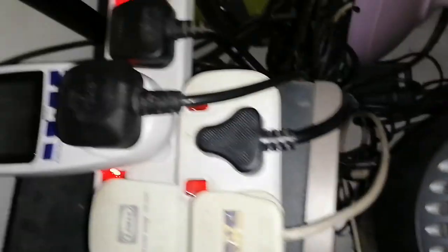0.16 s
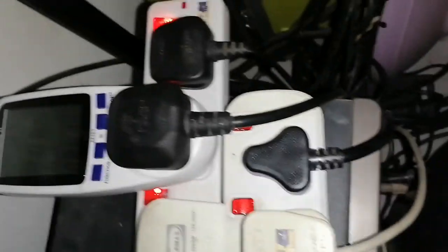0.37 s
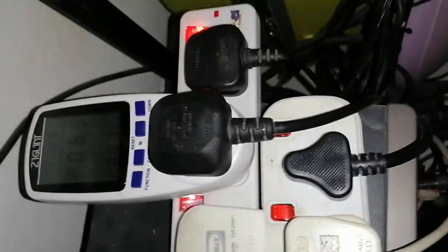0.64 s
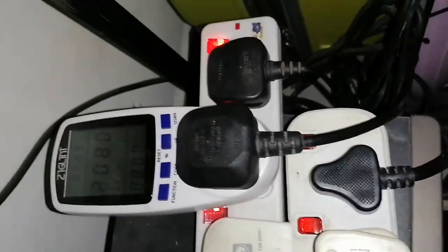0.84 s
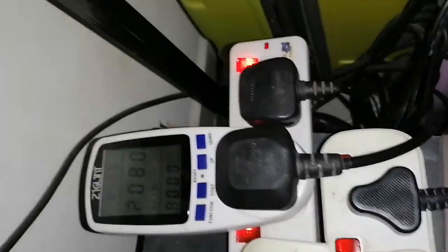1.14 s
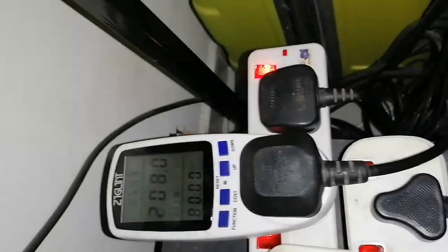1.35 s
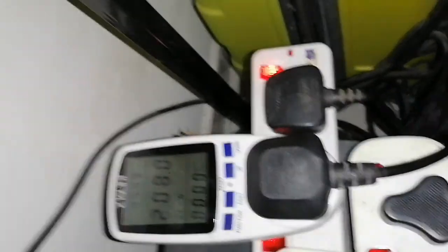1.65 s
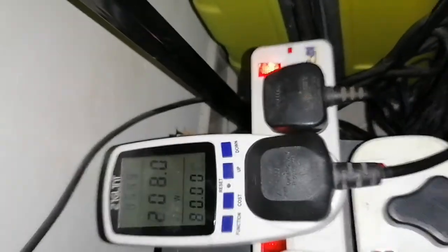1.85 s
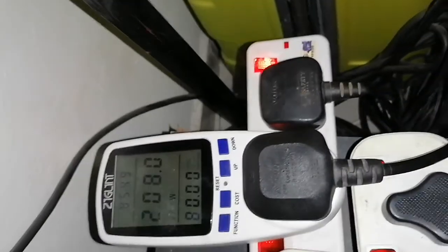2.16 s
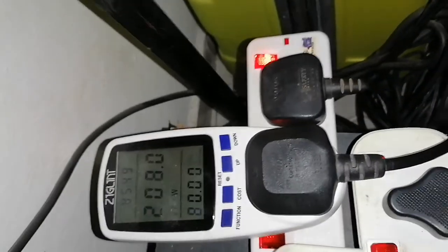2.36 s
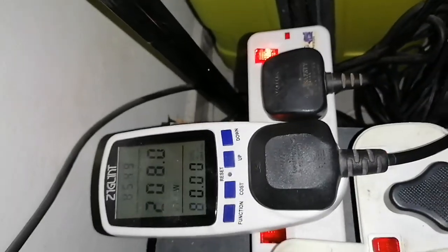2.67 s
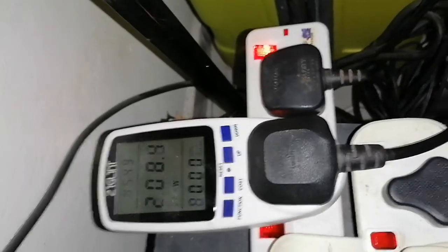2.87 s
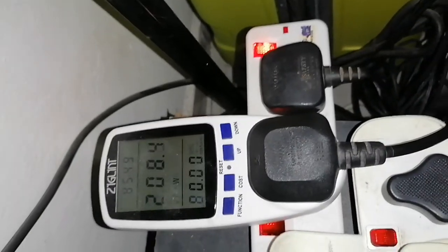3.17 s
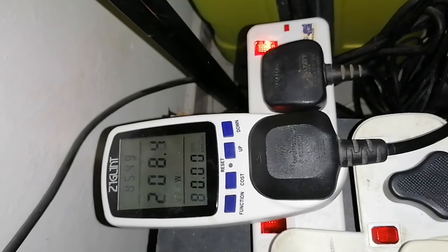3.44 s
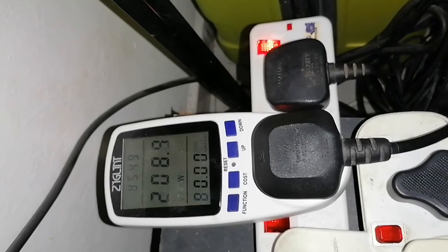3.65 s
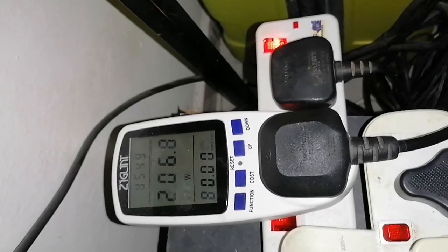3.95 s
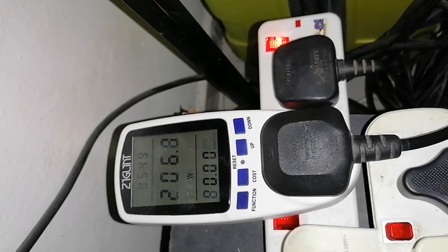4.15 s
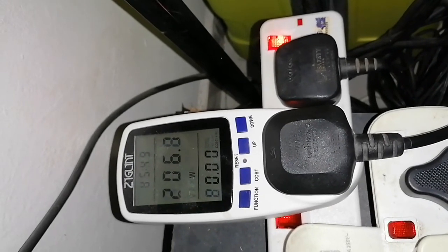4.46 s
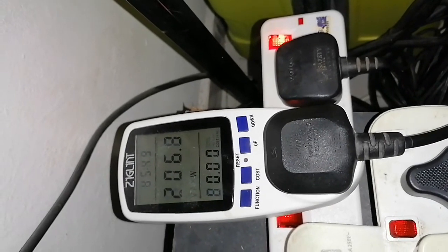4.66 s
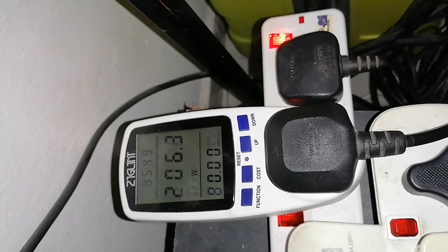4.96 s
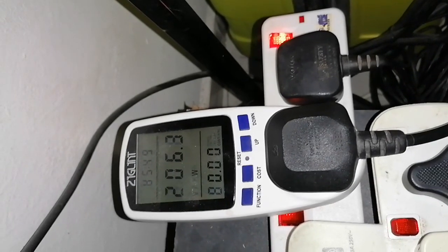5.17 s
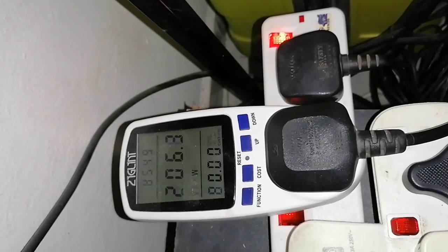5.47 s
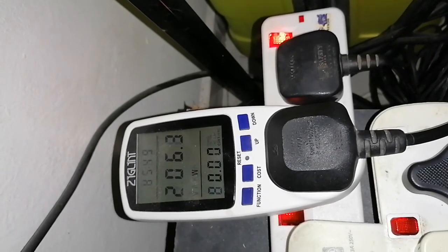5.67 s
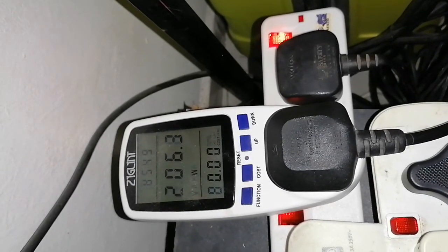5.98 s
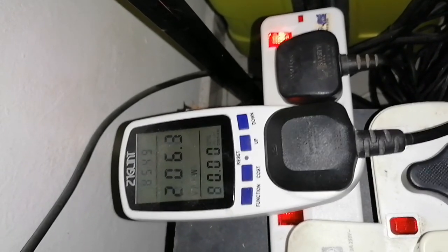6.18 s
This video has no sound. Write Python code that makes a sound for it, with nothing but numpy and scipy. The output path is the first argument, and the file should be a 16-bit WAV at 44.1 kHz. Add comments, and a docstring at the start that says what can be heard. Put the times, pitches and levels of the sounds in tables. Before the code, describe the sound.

Close to running computers in a cramped corner, cooling fans give a continuous airy rush over a low hum and faint whine. A soft rustle opens it. From about one and a half seconds a finger knocks the handheld microphone, brushes twice, taps and slides, mostly on the left. Rubbing fades by three seconds, leaving only steady fans.

```python
"""Rushing, humming computer fans, with mains buzz and faint coil whine; a soft rustle at the very start.
Fans are coloured noise, tones are wandering sines; standing waves fade as the handset moves in.
At the left port a finger knocks, brushes twice, taps and slides to rest: filtered impulses for the
knocks and taps, shaped noise for the rubbing. Gain control and a treble cut follow."""
import sys
import numpy as np
from scipy import signal
from scipy.fft import rfft, irfft
from scipy.io import wavfile

SR = 44100
rng = np.random.default_rng(int(sys.argv[2]) if len(sys.argv) > 2 else 0)


def generate_wav(signal):
    """Clip the signal to [-1, 1] and save it as 16-bit WAV at the path in sys.argv[1]."""
    frames = np.transpose(np.atleast_2d(signal))
    scaled = np.clip(frames, -1, 1) * 32767
    pcm = np.round(scaled).astype(np.int16)
    wavfile.write(sys.argv[1], SR, pcm)


N = 278491
TIME_S = np.arange(N) / SR
FREQS_HZ = np.maximum(np.fft.rfftfreq(N, 1 / SR), 1)

# Levels below are before the trims and the gain control.
# fan rush at each microphone: freq_hz, left_db_per_hz, right_db_per_hz
FAN_SPECTRUM = [(15.0, -81.7, -73.0), (45.0, -74.4, -69.0), (130.0, -78.8, -73.6), (260.0, -80.1, -78.2),
                (600.0, -86.8, -84.0), (900.0, -78.8, -95.0), (1200.0, -90.4, -86.3),
                (1500.0, -98.9, -88.1), (3000.0, -100.4, -91.9), (3900.0, -108.2, -101.4),
                (5200.0, -102.4, -97.1), (8800.0, -111.2, -102.3), (11500.0, -111.5, -107.1),
                (15600.0, -116.0, -110.9)]
# case, corner and port resonances: freq_hz, width_hz, left_db, right_db
RESONANCES = [(71, 12, 4.5, 2), (160.4, 10, 5.5, 4), (197.4, 39, 6.5, 5), (290, 35, 0, 3.5),
              (347, 36, 1.5, 0.5), (451, 73.3, -0.5, 11.5), (517, 52, 4.5, 10), (570, 50, 1.5, -1),
              (706, 216, -2, 12), (862, 103, -7, -1), (969, 173, -2.5, 9.5), (1940, 52, -12, 2.5),
              (2110, 430, 4, 3.5), (2720, 480, 4.5, 0.4), (3300, 410, 6, 1.2), (6410, 910, 4, 5),
              (7248, 570, 14.5, 12.5), (7220, 150, 1.5, 2), (10350, 2100, -1.5, -2), (14600, 500, 6.2, 6.5)]
# likeness of the air noise at both microphones: freq_hz, likeness_0_to_1, left_lead_rad
LIKENESS = [(40.6, 0.87, 0), (130, 0.91, 0.2), (313, 0.92, -1), (363, 0.03, 1), (435, 0.8, -3.5),
            (470, 1, -1), (596, 0.62, -1.5), (745, 1, 1.74), (903, 0.3, -3), (1210, 0.53, -3.0),
            (1450, 0.05, 2.5), (12000, 0.02, -8)]
# rotor and blade tones, mains hum, coil whine: freq_hz, left_rms_db, right_rms_db
TONES = [(41.0, -58.2, -53.8), (48.0, -54.7, -49.1), (82.0, -58.6, -54.2), (100.0, -70.8, -65.8),
         (120.0, -64.0, -48.7), (123.0, -65.0, -62.0), (150.0, -67.0, -63.5), (164.3, -58.4, -52.7),
         (186.5, -63.4, -58.8), (194.5, -61.6, -57.1), (205.5, -63.8, -59.5), (219.0, -69.3, -66.1),
         (252.5, -72.3, -66.9), (291.5, -71.6, -69.7), (327.5, -72.5, -71.0), (360.0, -66.0, -66.5),
         (514.0, -73.0, -60.5), (600.0, -80.0, -71.0), (2288.0, -93.3, -78.5), (6850.5, -88.5, -84.9),
         (7001.0, -82.0, -82.0), (7051.0, -85.5, -73.8), (12053.5, -105.8, -89.0)]
# corner colour away from the resting place: freq_hz, width_hz, left_db, right_db
STANDING_WAVES = [(124, 22, 8, -2.5), (286, 22, 4.5, 0), (410, 59, -4, 6), (482, 37, 11, 0),
                  (660, 82, 6.5, -4), (900, 110, 0, 2.5), (1250, 110, 1, 2), (1690, 230, 2, 3),
                  (8000, 8900, 1.6, 0.5)]
# handset distance from its resting place: time_s, offset_0_to_1
HANDSET_OFFSET = [(0, 1), (1.1, 0.76), (1.7, 0.3), (2.6, 0.04), (6.3, 0)]
# knocks on the casing: start_s, thud_db, thud_low_hz, thud_high_hz, ring_db, tick_db, tick_hz, sway_db
KNOCKS = [(1.5403, 17.6, 125, 1140, 0.7, -14, 6300, 8), (1.5433, 7, 170, 270, -20, -26, 10000, -20),
          (1.8425, -4, 250, 650, -40, -40, 6500, -15), (1.9573, 12.5, 430, 920, -33, -21, 6500, -10),
          (1.9632, 2, 80, 850, -35, -35, 6500, -10), (2.0101, 7.3, 140, 900, -25, -26, 6500, -10),
          (2.055, 10, 140, 360, -40, -34, 6500, -10), (2.9115, -20, 200, 900, -32, -21, 6500, -18)]
# casing ring: freq_hz, width_hz, level_db (relative)
CASING_MODES = [(1700, 480, 2.5), (3250, 1500, -2.5), (5100, 1150, 1)]
# finger brushing the port: start_s, length_s, final_level_db, swell_db, catch_db (as the skin lets go)
BRUSHES = [(1.622, .055, -39, -0.5, -50), (1.733, .054, -34, 12, -30)]
# finger pushes along the casing: start_s, length_s, level_db
SLIDES = [(1.988, .029, -48), (2.045, .018, -58), (2.072, .1, -52.5), (2.174, .016, -44),
          (2.195, .027, -48.5), (2.23, .08, -56), (2.305, .075, -49), (2.38, .14, -54),
          (2.395, .044, -49.5), (2.478, .02, -54), (2.568, .016, -49.5), (2.654, .06, -54),
          (2.695, .012, -49), (2.805, .025, -60), (2.98, .035, -55.5)]
# low rumble of hard presses: start_s, length_s, final_level_db, swell_db
PRESSES = [(1.982, .038, -41.5, 4), (2.066, .044, -37.5, 3), (2.115, .02, -43, 0), (2.158, .022, -45.5, 0)]
# rustle as the handset swings in: start_s, length_s, final_level_db, swell_db
RUSTLE = (-0.1, 0.28, -63.5, -1)
# brushing spectrum: freq_hz, relative_db
BRUSH_COLOUR = [(100, -8), (700, -12), (950, 4), (1350, -7.5), (1700, -4.5), (2300, -7), (2900, -6),
                (3900, -18.5), (5400, -13), (7000, -8.5), (8200, -21), (11000, -31), (15000, -42)]
# sliding spectrum: freq_hz, relative_db
SLIDE_COLOUR = [(200, 5), (1000, 5.5), (1400, -8), (1900, 1.5), (2400, -4), (2800, 4), (3700, -6.5),
                (5500, 2.5), (6900, 2.5), (8200, -9), (11000, -21), (15000, -25)]
# pressing spectrum: freq_hz, relative_db
PRESS_COLOUR = [(40, -22), (140, 3), (240, 11), (520, -6), (780, -3), (1100, -5), (1400, -18), (2600, -15),
                (4000, -40)]
# rustle spectrum: freq_hz, relative_db
RUSTLE_COLOUR = [(1000, -4), (2000, -3), (3900, -6), (5200, -2), (6600, 3), (8500, -4.5), (11000, -11),
                 (15000, -13)]

FAN_TRIM_DB, TONE_TRIM_DB = -0.09, 0.1
CONTACT_DELAY_S = 0.0006  # the fingertip flattens before the casing rings
BRUSH_ATTACK_S, BRUSH_RELEASE_S = 0.016, 0.0053
CATCH_S, CATCH_LOW_EDGE_HZ = 0.0035, 4460
SLIDE_ATTACK_S, SLIDE_RELEASE_S = 0.011, 0.008
PRESS_ATTACK_S, PRESS_RELEASE_S = 0.0087, 0.0079
CREEP_START_S, CREEP_LENGTH_S = 2.07, 1.5
CREEP_FINAL_DB, CREEP_FADE_DB = -77, 21
SNAG_DB, SNAG_HZ = 0.55, 110  # slower unevenness of the grip
RUSTLE_RELEASE_S = 0.046
TREBLE_CUTOFF_HZ = 15600


def from_db(db):
    """Decibels to gain."""
    return 10 ** (np.asarray(db) / 20)


def rms_one(x):
    """Scale to unit power."""
    return x / np.sqrt(np.mean(x ** 2) + 1e-20)


def in_time(rows):
    """Interpolate a curve at every sample."""
    return np.interp(TIME_S, *np.transpose(rows))


def in_frequency(rows):
    """Interpolate each column at every frequency on a log axis."""
    hz, *columns = np.transpose(rows)
    return np.array([np.interp(np.log(FREQS_HZ), np.log(hz), column) for column in columns])


def bell(hz, width_hz):
    """Bell over frequency with unit peak; the width is two standard deviations."""
    return np.exp(-2 * ((FREQS_HZ - hz) / width_hz) ** 2)


def bumps(rows):
    """Left and right gain in dB of bell-shaped peaks and dips."""
    return sum(np.outer([left_db, right_db], bell(hz, width_hz))
               for hz, width_hz, left_db, right_db in rows)


def butter(x, hz, kind, order=2):
    """Causal low-, high- or band-pass."""
    sos = signal.butter(order, hz, kind, fs=SR, output="sos")
    return signal.sosfilt(sos, x + 1e-18)


def white():
    """Spectrum of fresh unit-power white noise."""
    return rfft(rng.standard_normal(N))


def drift(rate_hz):
    """Smooth random drift of unit rms."""
    return rms_one(irfft(white() / (1 + (FREQS_HZ / rate_hz) ** 2) ** 2, N))


def reflections(spread_db, decay_s):
    """Echoes off near walls comb the middle range with fine peaks and dips, in dB."""
    echoes = rng.standard_normal(N) * np.exp(-TIME_S / decay_s) * (TIME_S > decay_s / 2)
    comb = rms_one(rfft(echoes).real)
    middle = FREQS_HZ / (FREQS_HZ + 300) / (1 + (FREQS_HZ / 6500) ** 3)
    return spread_db * comb * middle


def fan_rush(flutter_db):
    """Blade turbulence: resonance-coloured noise, partly alike at both microphones, slightly fluttering."""
    combs_db = [reflections(spread_db=1.2, decay_s=0.012) for side in range(2)]
    level_db = in_frequency(FAN_SPECTRUM) + combs_db + bumps(RESONANCES)
    alike, lead_rad = in_frequency(LIKENESS)
    right = white()
    left = alike * np.exp(1j * lead_rad) * right + np.sqrt(1 - alike ** 2) * white()
    # sqrt(SR / 2) turns level per Hz into sample amplitude
    rush = irfft(np.array([left, right]) * from_db(level_db), N) * np.sqrt(SR / 2)
    return rush * from_db(flutter_db * drift(29))


def hum(wander, waver_db):
    """Rotor, mains and coil tones: sines that wander slightly in pitch and strength."""
    out = np.zeros((2, N))
    speeds = [drift(2.4) for k in range(4)]
    swells = [drift(5.7) for k in range(5)]
    for k, (hz, left_db, right_db) in enumerate(TONES):
        speed = 1 + wander * speeds[k % len(speeds)]
        turns = hz * np.cumsum(speed) / SR + rng.random()
        sine = np.sqrt(2) * np.sin(2 * np.pi * turns)
        tone = sine * from_db(waver_db * swells[k % len(swells)])
        out += np.outer(from_db([left_db, right_db]), tone)
    return out


def moving(fans):
    """Standing waves in the corner colour the fans until the handset has moved in."""
    away = irfft(rfft(fans) * from_db(bumps(STANDING_WAVES)), N)
    return fans + in_time(HANDSET_OFFSET) * (away - fans)


def surging(fans, hz, width_hz, swing_db, rate_band_hz):
    """The hollow whirr of the case swells and sinks irregularly, several times a second, within bounds."""
    whirr = irfft(rfft(fans) * bell(hz, width_hz), N)
    swell = rms_one(butter(rng.standard_normal(N), rate_band_hz, "band"))
    gain = rms_one(from_db(swing_db * np.tanh(swell)))
    return fans + (gain - 1) * whirr


def knocks(tick_width_hz, sway_band_hz, crackle_db, crackle_s):
    """Filtered impulses: thud, casing ring and tick at the left port; the handset's jolt at the right."""
    out = np.zeros((2, N))
    age_s = TIME_S[:SR // 10]
    blow = (age_s == 0) * 1.0
    half_tick_hz = tick_width_hz / 2
    for start_s, thud_db, low_hz, high_hz, ring_db, tick_db, tick_hz, sway_db in KNOCKS:
        thud = butter(butter(blow, high_hz, "low", order=6), low_hz, "high", order=1)
        # the skin crackles for a few milliseconds as it flattens
        crackle = from_db(crackle_db) * rng.standard_normal(len(age_s)) * np.exp(-age_s / crackle_s)
        contact = np.roll(blow + crackle, round(CONTACT_DELAY_S * SR))
        ring = sum(from_db(db) * butter(contact, [hz - width_hz / 2, hz + width_hz / 2], "band")
                   for hz, width_hz, db in CASING_MODES)
        tick = butter(contact, [tick_hz - half_tick_hz, tick_hz + half_tick_hz], "band")
        near = from_db(thud_db) * thud + from_db(ring_db) * ring + from_db(tick_db) * tick
        far = from_db(sway_db) * butter(blow, sway_band_hz, "band")
        start = round(start_s * SR)
        out[:, start:start + len(age_s)] += [near, far]
    return out


def stroke(start_s, length_s, level_db, swell_db, attack_s, release_s):
    """Strength of one movement: it lands, changes steadily in dB to its final level and lifts off."""
    age_s = TIME_S - start_s
    landing = np.sin(np.pi / 2 * np.clip(age_s / attack_s, 0, 1)) ** 2
    lifting = np.exp(-np.clip((age_s - length_s) / release_s, 0, 20))
    progress = np.clip(age_s / length_s, 0, 1)
    return from_db(level_db + swell_db * (progress - 1)) * landing * lifting


def friction(strength, colour, grain_db, slip_hz):
    """Skin catches and slips on plastic: noise in tiny surges, bunched by an uneven grip."""
    surges_db = grain_db * drift(slip_hz) + SNAG_DB * drift(SNAG_HZ)
    slips = rng.standard_normal(N) * from_db(surges_db)
    coloured = irfft(rfft(slips) * from_db(in_frequency(colour)[0]), N)
    return strength * rms_one(coloured)


def finger(far_port_db, far_casing_db):
    """Friction noise, strongest at the left; brush and press leak right, slides cross the casing."""
    brushing = sum(stroke(*row, BRUSH_ATTACK_S, BRUSH_RELEASE_S) for *row, catch_db in BRUSHES)
    catching = sum(from_db(catch_db) * np.exp(-((TIME_S - start_s - length_s) / CATCH_S) ** 2)
                   for start_s, length_s, _, _, catch_db in BRUSHES)
    # overlapping pushes add in power
    sliding = sum(stroke(*row, 0, SLIDE_ATTACK_S, SLIDE_RELEASE_S) ** 2 for row in SLIDES) ** 0.5
    # the resting finger creeps beneath the pushes, fading as the grip settles
    creeping = stroke(CREEP_START_S, CREEP_LENGTH_S, CREEP_FINAL_DB, -CREEP_FADE_DB,
                      SLIDE_ATTACK_S, SLIDE_RELEASE_S)
    pressing = sum(stroke(*row, PRESS_ATTACK_S, PRESS_RELEASE_S) for row in PRESSES)
    brush = friction(brushing, BRUSH_COLOUR, grain_db=2.0, slip_hz=1300)
    slide = friction(np.hypot(sliding, creeping), SLIDE_COLOUR, grain_db=2.0, slip_hz=800)
    press = friction(pressing, PRESS_COLOUR, grain_db=4.0, slip_hz=300)
    catch = friction(catching, BRUSH_COLOUR, grain_db=-2.5, slip_hz=700)
    catch = butter(catch, CATCH_LOW_EDGE_HZ, "high")
    at_port = np.outer(from_db([0, far_port_db]), brush + catch + press)
    through_casing = np.outer(from_db([0, far_casing_db]), slide)
    return at_port + through_casing


def rustle(right_db):
    """Faint dry hiss as the hand moves: separate friction noise at each microphone."""
    strength = stroke(*RUSTLE, SLIDE_ATTACK_S, RUSTLE_RELEASE_S)
    return np.array([friction(strength * from_db(db), RUSTLE_COLOUR, grain_db=2.5, slip_hz=300)
                     for db in (0, right_db)])


def scene():
    """Fans in both ears, handling noise mostly on the left."""
    rush = from_db(FAN_TRIM_DB) * fan_rush(flutter_db=0.5)
    tones = from_db(TONE_TRIM_DB) * hum(wander=0.000614, waver_db=0.77)
    fans = moving(rush + tones)
    fans = surging(fans, hz=502, width_hz=73, swing_db=4.0, rate_band_hz=(4.55, 18.2))
    taps = knocks(tick_width_hz=1800, sway_band_hz=(52.5, 101.85), crackle_db=-29.0, crackle_s=0.0034)
    rubbing = finger(far_port_db=-23.5, far_casing_db=-30)
    return fans + taps + rubbing + rustle(right_db=6.0)


def gain_control(x, threshold_db, slope, release_db_per_s):
    """A loud peak on either side turns both down; the gain creeps back."""
    peak_db = 20 * np.log10(np.abs(x).max(axis=0) + 1e-9)
    cut_db = slope * np.maximum(peak_db - threshold_db, 0)
    release_db = release_db_per_s * TIME_S
    held_db = np.maximum.accumulate(cut_db + release_db) - release_db
    return x * from_db(-butter(held_db, 9.7, "low", order=1))


def record(dry):
    """Gain control, then a steep treble cut."""
    levelled = gain_control(dry, threshold_db=-23.5, slope=0.18, release_db_per_s=2.5)
    sos = signal.ellip(12, 0.1, 80, TREBLE_CUTOFF_HZ, fs=SR, output="sos")
    return signal.sosfilt(sos, levelled)


dry = scene()
out = record(dry)
generate_wav(out)
```